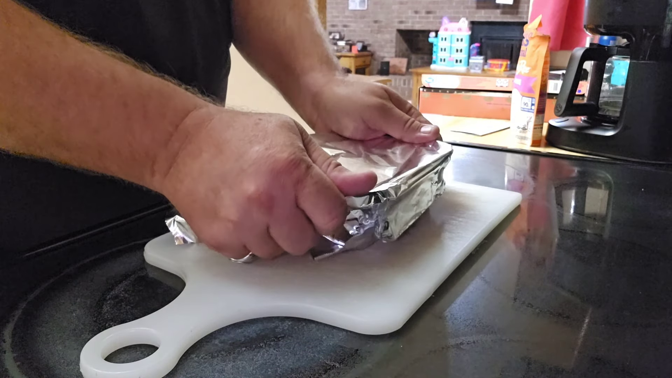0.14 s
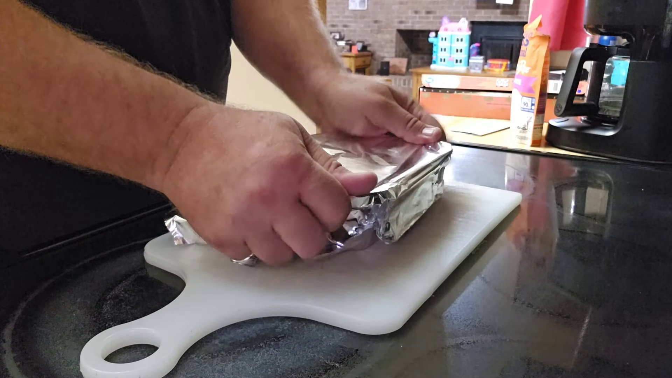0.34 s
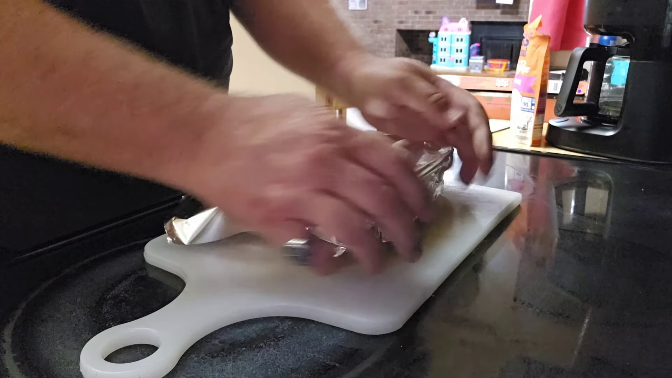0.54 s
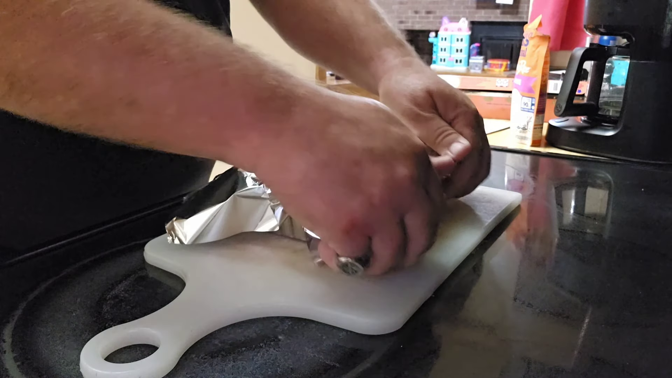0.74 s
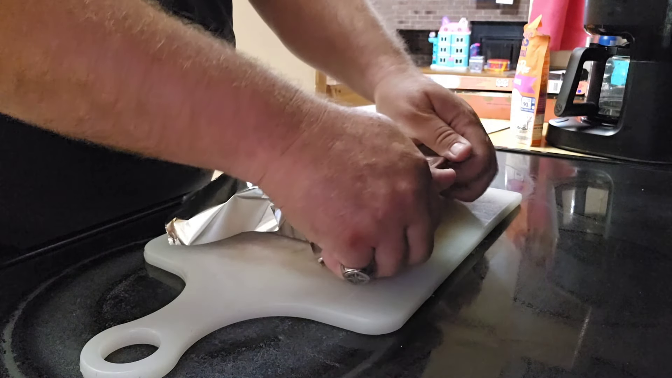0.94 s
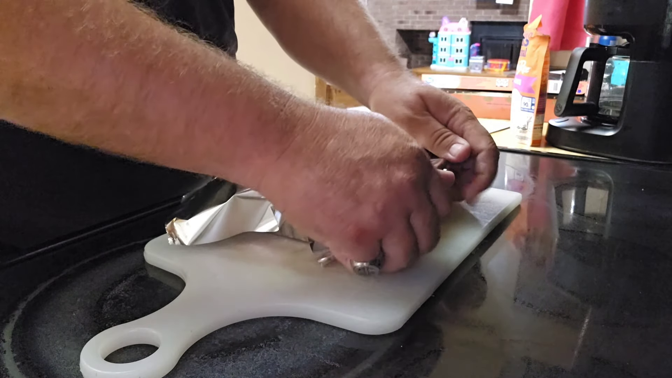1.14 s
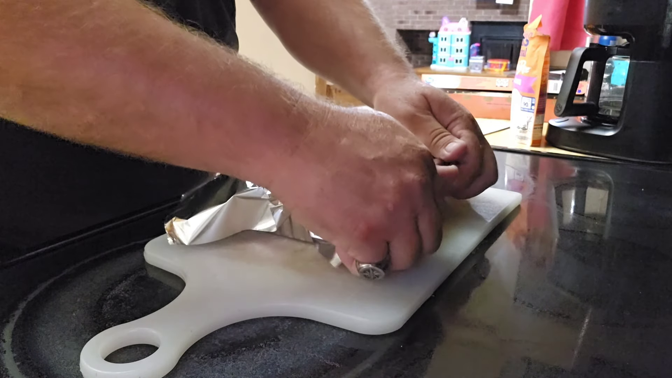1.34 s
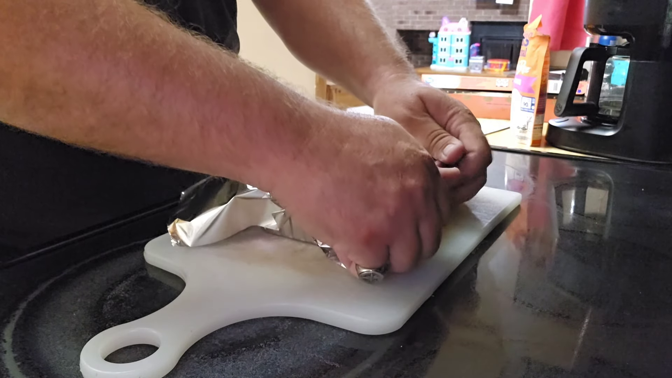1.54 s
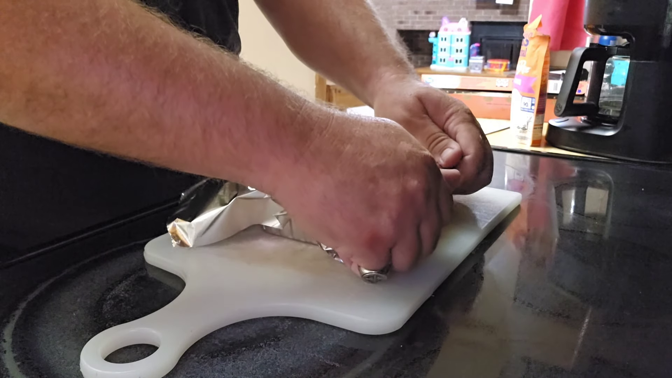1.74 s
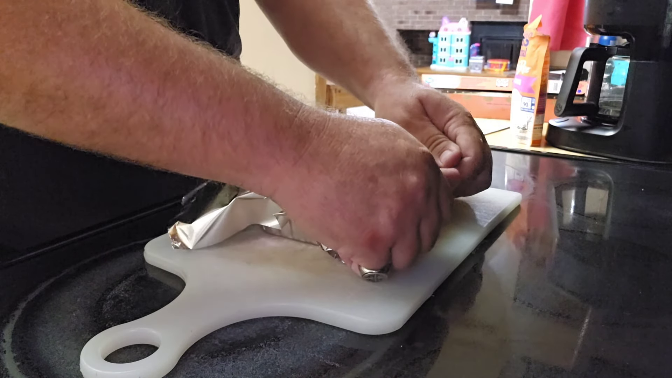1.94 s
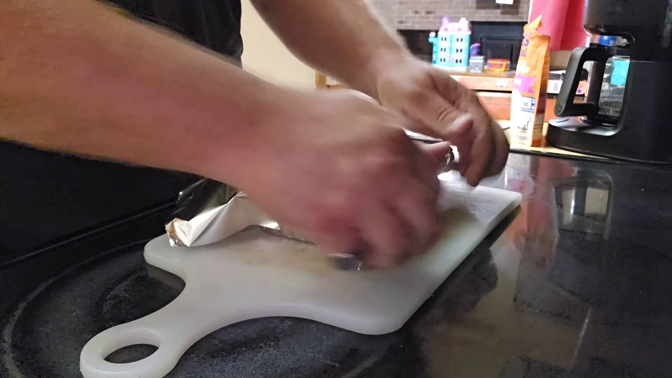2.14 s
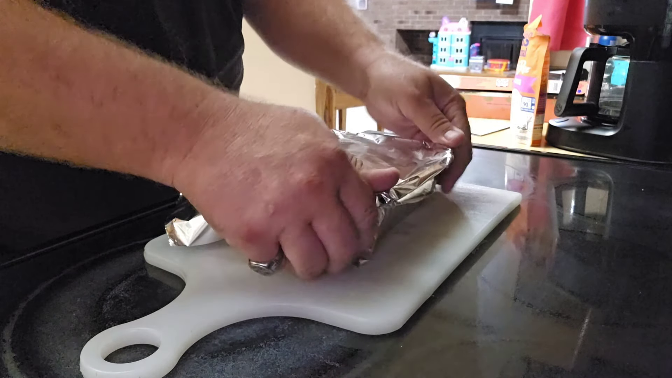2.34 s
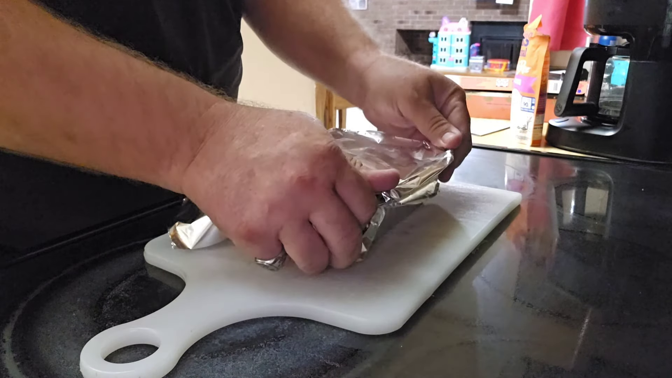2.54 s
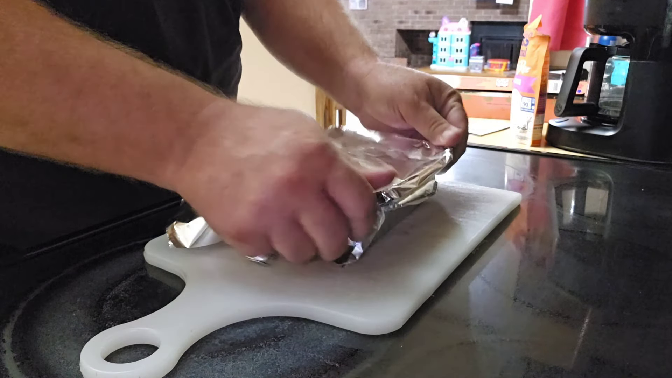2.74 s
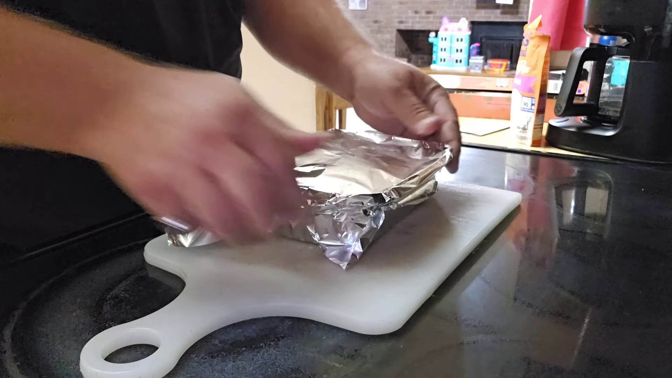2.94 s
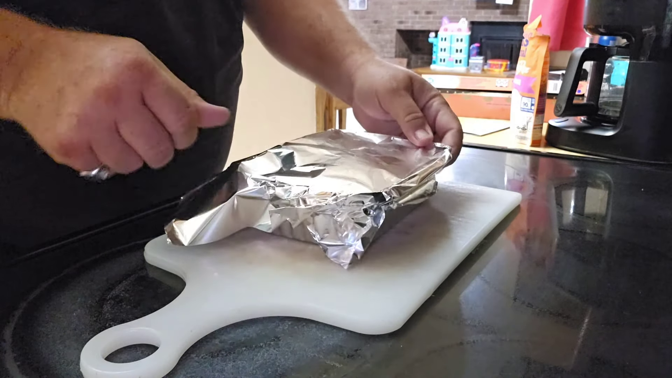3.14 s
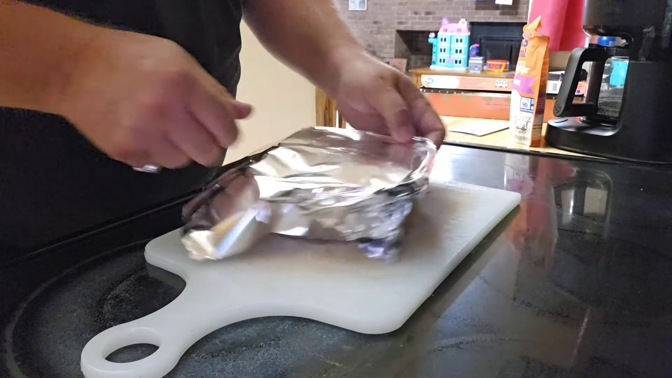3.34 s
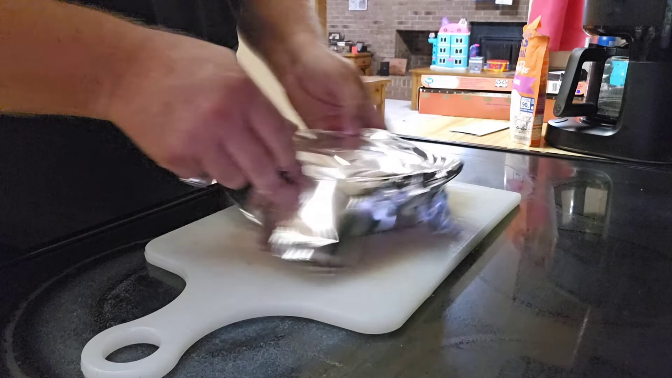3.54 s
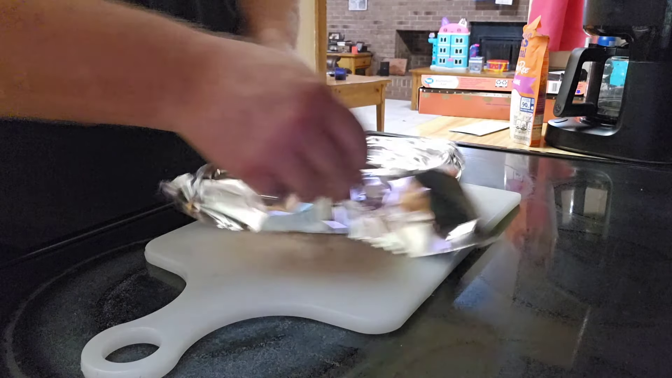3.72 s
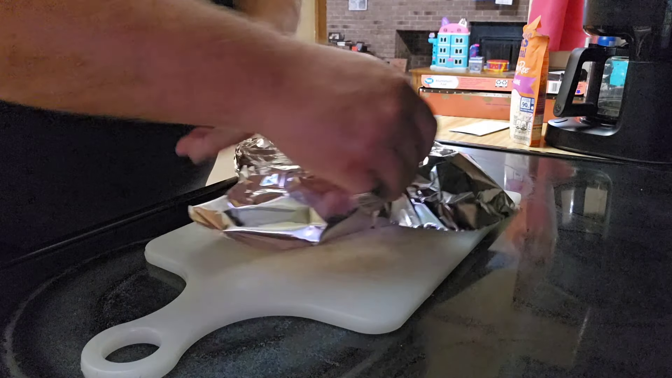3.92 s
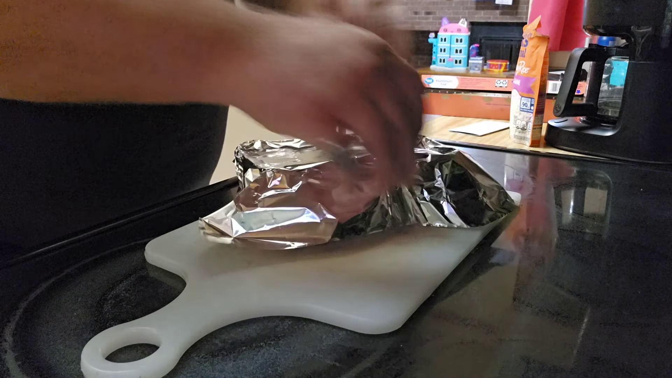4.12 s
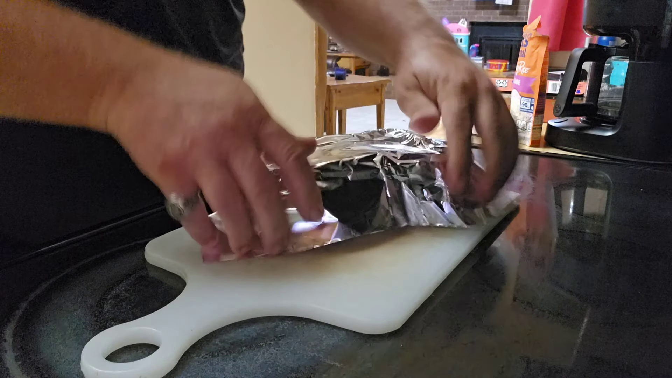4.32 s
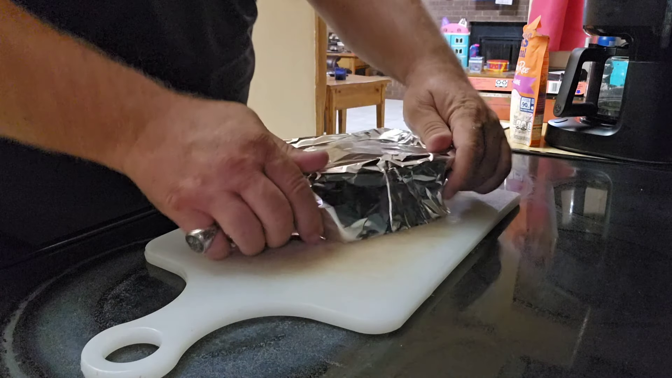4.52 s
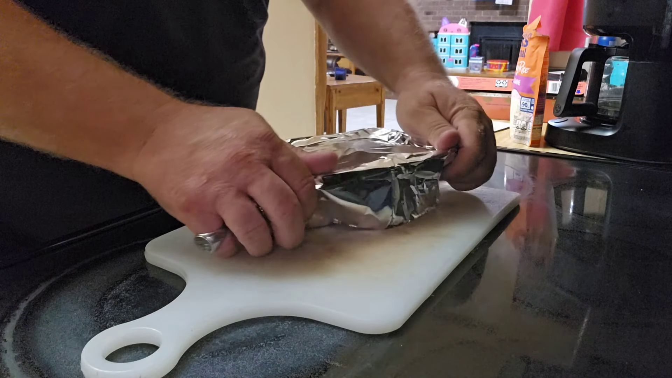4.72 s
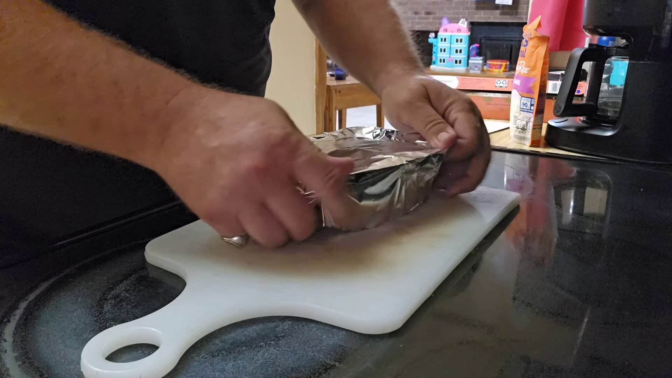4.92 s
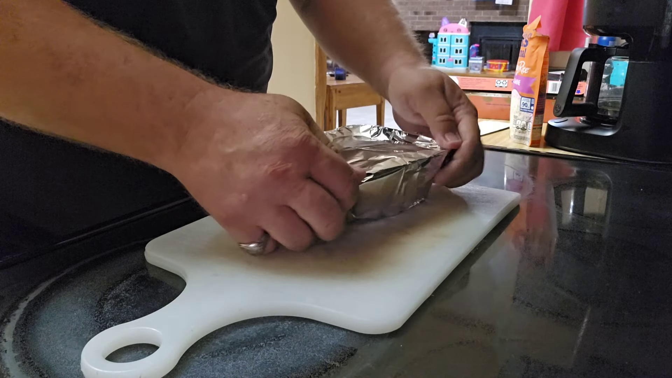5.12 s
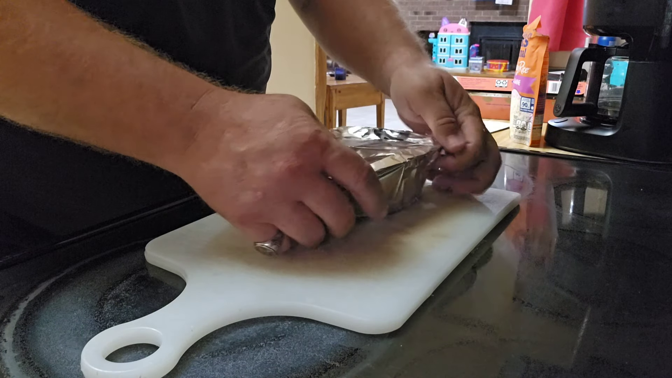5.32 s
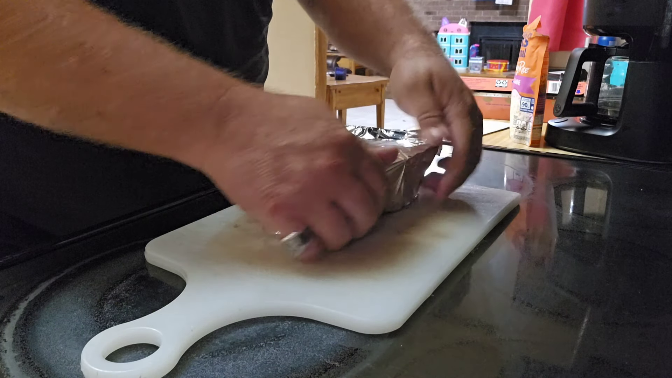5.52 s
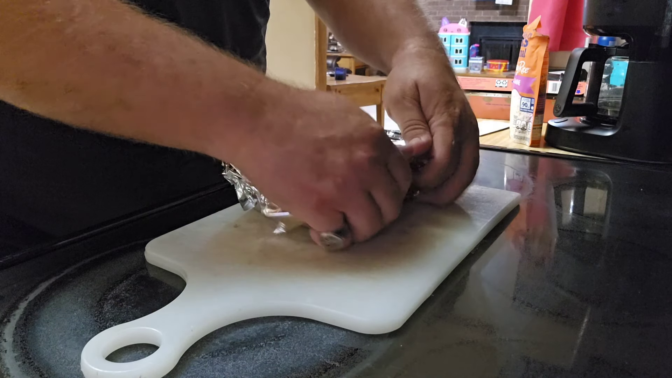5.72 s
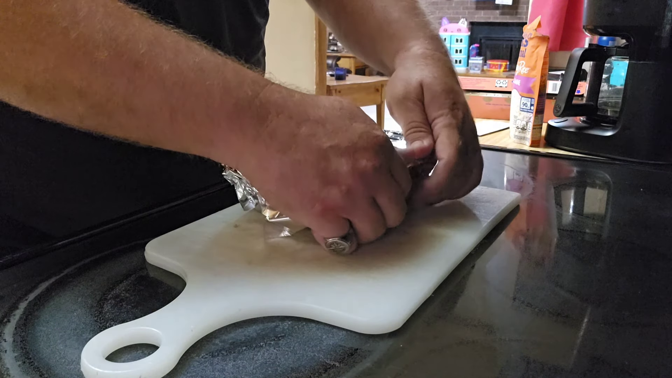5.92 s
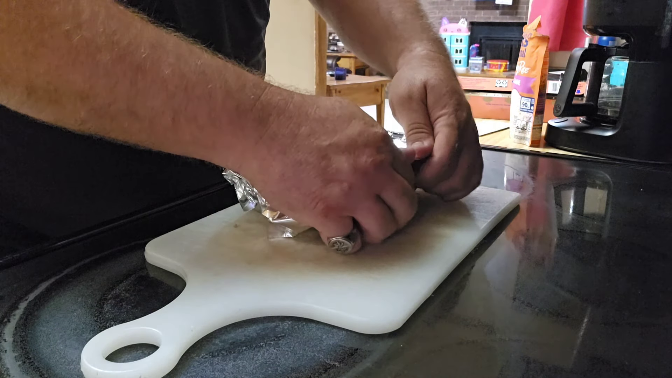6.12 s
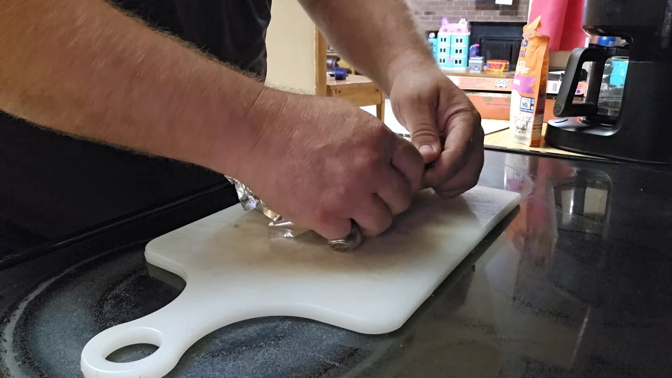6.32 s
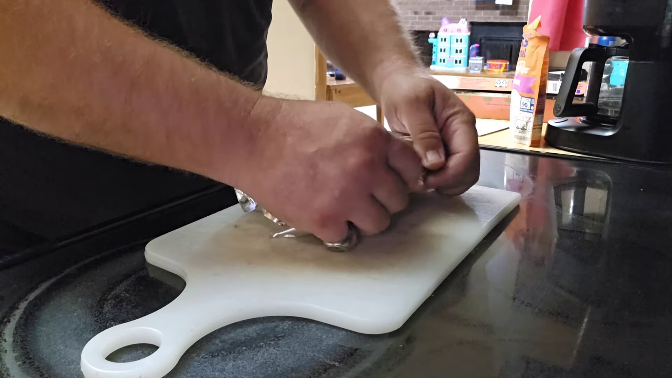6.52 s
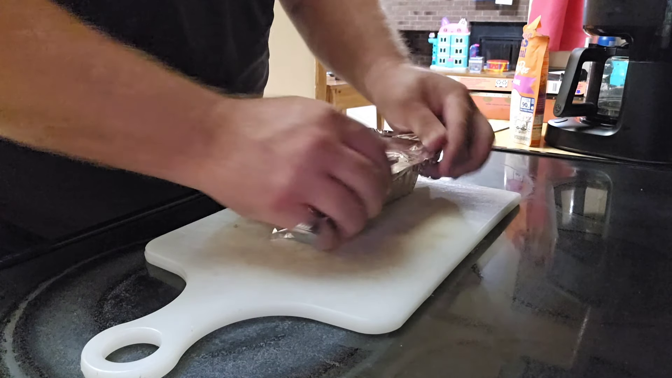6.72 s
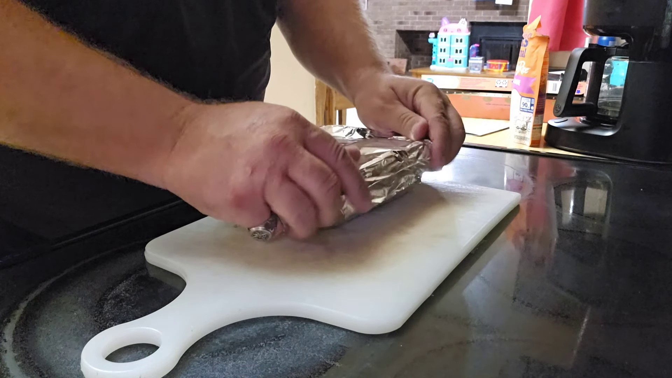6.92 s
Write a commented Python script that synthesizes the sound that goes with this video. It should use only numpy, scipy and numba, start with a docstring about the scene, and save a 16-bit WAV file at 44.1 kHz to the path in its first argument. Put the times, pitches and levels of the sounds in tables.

```python
"""Foil folded round a dish

Two hands fold and press thin metal foil round a dish on a plastic board, close to a phone on a kitchen counter.
Creases buckle as showers of tiny damped rings, and each fold lets go as a short avalanche of them.
Knocks wake the modes of the dish and board underneath; bumps add dull, fast-fading low tones.
An appliance hums over shaped-noise rumble; foil, dish and bumps sound in a small hard room."""
import sys
import numpy as np
from scipy import signal
from scipy.fft import rfft, irfft, next_fast_len
from scipy.io import wavfile
from scipy.ndimage import uniform_filter1d
from numba import njit

SR = 44100
rng = np.random.default_rng(int(sys.argv[2]) if len(sys.argv) > 2 else 0)


def int16_out(signal):
    """Quantize to a 16-bit WAV file."""
    q = np.round(np.clip(np.atleast_2d(signal).T, -1, 1) * 32767)
    wavfile.write(sys.argv[1], SR, q.astype(np.int16))


def attenuation_scalar(level_db):
    """Turn a level in dB into a linear amplitude multiplier (20 dB per decade)."""
    decades = np.asarray(level_db, float) / 20
    return 10 ** decades


N = 307377  # length in samples

# kitchen rumble, joined on a log-frequency axis: f/Hz, relative level/dB
RUMBLE_COLOUR = [(15, -53), (25, -3.5), (70, -5.5), (123, -7), (200, -6), (285, -15), (317, -28.5),
                 (463, -18), (516, -27.5), (962, -30), (1290, -34), (2690, -35), (5280, -56), (16000, -91)]
# motor tones, before they waver: f/Hz, rms level/dB
HUM_TONES = [(59.5, -63), (182, -65), (213, -68)]
# steady hand work, before lulls and foil colour: t/s, crackle level/dB, dish ring above crackle/dB
HAND_EFFORT = [(0, -31, -9.5), (0.25, -37.5, -9), (0.45, -40, -11), (0.8, -40, -10.5), (1.15, -43.5, -6.5),
               (1.4, -41.5, -8), (1.8, -34.5, -17.5), (2.08, -43.5, -2.5), (2.4, -45.5, -7),
               (2.55, -36, -10), (2.8, -38.5, -10.5), (3.05, -54, -14), (3.4, -39, -14),
               (3.56, -44.5, -11.5), (3.651, -28, -2), (3.8, -25, -6), (4.1, -40.5, -4), (4.6, -31.5, -4.5),
               (5.25, -41.5, -6.5), (5.7, -35.5, -12.5), (6.5, -37, -8), (6.97, -33, -10)]
# hands ease off or let go to take a new grip: start t/s, length/s, crackle drop/dB (negative lifts it)
GRIP_LULLS = [(0.24, 0.067, 3), (0.527, 0.17, 23), (0.805, 0.048, -3), (1.076, 0.034, 9),
              (1.197, 0.069, 14), (1.43, 0.031, 5.5), (1.929, 0.068, 8.5), (2.116, 0.19, 29),
              (2.665, 0.066, 13), (2.811, 0.17, 21.5), (3.05, 0.081, 6), (3.227, 0.053, 9),
              (4.145, 0.19, 34), (4.906, 0.06, 0.5), (5.345, 0.08, 6.5), (5.491, 0.1, 10.5),
              (5.785, 0.097, 11.5), (6.273, 0.05, 8), (6.638, 0.16, 10)]
# tone of the foil sheet, joined on a log-frequency axis: f/Hz, gain/dB
FOIL_COLOUR = [(1400, -17), (2400, -1.5), (3500, -1), (4200, 3), (7350, 2), (8350, -0.5), (9560, 0.5),
               (10400, -4), (15100, -0.5), (16200, -19)]
# modes of the wrapped dish on its board: f/Hz, bandwidth/Hz, relative level/dB
DISH_MODES = [(245, 15.4, -21), (454, 103, -21), (763, 66, -9.5), (1145, 126, -3), (1284, 64, -6.5),
              (1401, 60, -2), (1648, 39, -7), (2065, 63.5, 2), (2231, 42, -3.5), (2720, 270, -0.5)]
# clearest folds that let go, before foil colour: t/s, length/s, level/dB, dish ring above fold/dB
CLEAR_FOLDS = [(0.024, 0.023, -29.5, -16), (0.058, 0.023, -34.5, -7.5), (0.201, 0.01, -22.5, -14),
               (0.225, 0.012, -33, -31), (0.303, 0.012, -31, -19.5), (0.3524, 0.021, -31, -5.5),
               (0.38, 0.041, -28, -11), (0.434, 0.011, -29.5, -28), (0.5052, 0.019, -27.5, -16),
               (0.711, 0.0085, -35.5, -17), (0.7184, 0.0099, -27.5, -15), (0.7662, 0.027, -30, -13),
               (0.856, 0.019, -29, -18.5), (0.947, 0.0074, -32.5, -11.5), (1.1287, 0.0052, -26.5, -19.5),
               (1.1522, 0.047, -32.5, -6.5), (1.268, 0.015, -48, -7), (1.317, 0.01, -29.5, -12),
               (1.361, 0.016, -34, -13), (1.404, 0.011, -36.5, -24), (1.473, 0.009, -29.5, -9.5),
               (1.499, 0.016, -34.5, -5), (1.5407, 0.012, -28.5, -1), (1.6566, 0.018, -29, -8.5),
               (1.736, 0.018, -31.5, -7.5), (1.76, 0.013, -35, -13), (1.887, 0.017, -26.5, -10),
               (2.026, 0.034, -27.5, -11), (2.13, 0.011, -42.5, -2), (2.2982, 0.014, -32, -14),
               (2.3384, 0.028, -43, -9), (2.417, 0.013, -34, -20), (2.4355, 0.0074, -28.5, -31),
               (2.483, 0.014, -33, -24), (2.51, 0.013, -28, -28), (2.546, 0.019, -31, -18),
               (2.643, 0.01, -26, -28.5), (2.7776, 0.017, -29.5, -18), (2.995, 0.012, -40, -16),
               (3.01, 0.019, -39.5, -15), (3.1185, 0.0073, -33.5, -21), (3.15, 0.0038, -31.5, -34),
               (3.177, 0.028, -43, -16), (3.211, 0.016, -34, -20), (3.291, 0.026, -38, -8.5),
               (3.321, 0.012, -40.5, 0), (3.439, 0.05, -37.5, -7.5), (3.501, 0.031, -32.5, -17),
               (3.605, 0.061, -31, -14.5), (4.0796, 0.034, -28.5, -8.5), (4.324, 0.012, -38.5, -23),
               (4.3464, 0.032, -19.5, -12.5), (4.428, 0.047, -31.5, -24), (4.474, 0.02, -27.5, -10),
               (4.4955, 0.053, -26, -7), (4.647, 0.023, -25.5, -2.5), (4.703, 0.027, -29, -1),
               (4.736, 0.014, -25, -1), (4.758, 0.06, -29, -13.5), (4.893, 0.0076, -32.5, -24),
               (4.967, 0.027, -33, -3.5), (5.014, 0.034, -26, -10.5), (5.102, 0.032, -27.5, -5),
               (5.223, 0.051, -34, -16), (5.3133, 0.0087, -27, -11.5), (5.4, 0.015, -32.5, -7.5),
               (5.4714, 0.028, -36, -2), (5.571, 0.0095, -34, -24), (5.589, 0.041, -34.5, -3.5),
               (5.725, 0.013, -31, -9), (5.764, 0.015, -34, -6), (5.823, 0.014, -34.5, -7),
               (5.886, 0.008, -37, -9), (5.894, 0.016, -23, -10.5), (6.2043, 0.0095, -25.5, -9.5),
               (6.2524, 0.0089, -33, -28), (6.3244, 0.014, -33, -1), (6.395, 0.016, -27.5, -4.5),
               (6.5475, 0.01, -30.5, -13), (6.575, 0.035, -33, -6.5), (6.624, 0.017, -39, -5),
               (6.7164, 0.03, -35, -11.5), (6.789, 0.013, -27.5, -21.5), (6.8034, 0.04, -28, -14.5),
               (6.861, 0.013, -26.5, -7), (6.89, 0.025, -28, -15.5), (6.944, 0.02, -31, -15)]
# dish and knuckles bump the board: t/s, relative level/dB, f/Hz
BOARD_BUMPS = [(0.387, -46.5, 487), (0.509, -47, 410), (1.888, -61, 730), (3.738, -56, 624),
               (4.511, -39, 715), (4.65, -49.5, 245), (4.791, -39, 681), (5.106, -56, 245),
               (5.609, -41.5, 252)]

RUMBLE_DB = -60  # rms of the part shared by both ports, before balance
EASE_SHARE, REGRIP_SHARE = 0.33, 0.12  # parts of a lull spent fading out and coming back
CREASES_PER_S = 8000
KNOCK_EVERY = 8  # one ring in this many also knocks the dish
RINGS_PER_FOLD = 160
FOLD_TILT_DB = 4.5  # treble lift per octave above 6 kHz
SMALL_FOLDS_PER_S = 14
SMALL_FOLD_S, SMALL_FOLD_DB, SMALL_DISH_DB = .007, 3, -10  # typical length, level over crackle, ring over fold
TOP_HZ = 15900


def colour(x, points):
    """Shape a spectrum by (Hz, dB) points joined on a log-frequency axis."""
    hz, db = np.transpose(points)
    n = next_fast_len(N)
    f = np.maximum(np.arange(n // 2 + 1) * SR / n, 1)
    gain = attenuation_scalar(np.interp(np.log(f), np.log(hz), db))
    return irfft(rfft(x, n) * gain, n)[..., :N]


def walk(rate):
    """Random levels held 1 / rate s and slewed twice; spread near 1."""
    hold = int(SR / rate)
    steps = np.repeat(rng.standard_normal(N // hold + 1), hold)
    return 1.37 * uniform_filter1d(uniform_filter1d(steps, hold), hold)[:N]


def kitchen():
    """Steady rumble and wavering motor tones; bass nearly alike at both ports."""
    mid, side = colour(rng.standard_normal((2, N)), RUMBLE_COLOUR)
    side = colour(side, [(100, -18.5), (600, 0), (2500, -17.0)])
    rumble = (mid + side * np.array([[1], [-1]])) * attenuation_scalar(RUMBLE_DB) / np.std(mid)
    t = np.arange(N) / SR
    hum = np.zeros(N)
    for hz, db in HUM_TONES:
        level = np.sqrt(2) * attenuation_scalar(db + 1.4 * walk(13))
        hum += level * np.sin(2 * np.pi * hz * t + 1.31 * walk(7))
    return (rumble + hum) * attenuation_scalar(np.array([[.6], [-.6]]))


@njit
def rings(start, hz, decay, size, n):
    """Damped rings that begin between samples and fall to 1/e in decay seconds."""
    out = np.zeros(n)
    for g in range(len(hz)):
        rate = (2j * np.pi * hz[g] - 1 / decay[g]) / SR
        first = int(np.ceil(start[g]))
        z = size[g] * np.exp(rate * (first - start[g]))
        turn = np.exp(rate)
        for i in range(max(first, 0), min(n, first + int(5 * decay[g] * SR))):
            out[i] += z.imag
            z *= turn
    return out


def shower(s, hz, decay_ms, db, per_s, tail_db, lag=6.0, lag_spread=2.14, pan_db=3.5, pan_spread_db=3):
    """Rings scaled to rms db before panning; each has its own delay (samples) and balance at the two ports."""
    s, hz, decay_ms, db, per_s = (v.ravel() for v in np.broadcast_arrays(s, hz, decay_ms, db, per_s))
    decay = np.clip(decay_ms, .05, 20) / 1000
    hz = np.clip(hz, 100, .4 * SR)
    delay_draw, pan_draw, sign_draw = rng.standard_normal((len(s), 3)).T
    # a few rings stand well above the rest
    size = attenuation_scalar(tail_db * rng.exponential(size=len(s))) * np.sign(sign_draw)
    # a ring holds size^2 decay / 4 of energy
    size = size * attenuation_scalar(db) / np.sqrt(np.mean(size ** 2 * decay) * per_s / 4)
    late = lag + lag_spread * delay_draw
    pan = attenuation_scalar((pan_db + pan_spread_db * pan_draw) / 2)
    left = rings(s * SR, hz, decay, size * pan, N)
    right = rings(s * SR + late, hz, decay, size / pan, N)
    return np.array([left, right])


def effort(t):
    """Crackle level and dish ring (dB) at times t; a lull fades the crackle, then brings it back quickly."""
    s, db, dish_db = np.transpose(HAND_EFFORT)
    start, length, drop_db = np.transpose(GRIP_LULLS)[:, :, None]
    x = (t - start) / length
    eased = np.clip(np.minimum(x / EASE_SHARE, (1 - x) / REGRIP_SHARE), 0, 1)
    crackle_db = np.interp(t, s, db) - np.sum(drop_db * eased, axis=0)
    return crackle_db, np.interp(t, s, dish_db)


def crackle():
    """Small creases give way at random, swelling in quick bunches; a lighter touch sounds duller."""
    count = int(CREASES_PER_S * N / SR)
    when, pitch = rng.random((count, 2)).T
    t, at = when * N / SR, (when * N).astype(int)
    effort_db, dish_db = effort(t)
    db = effort_db + (2.1 * walk(35) + 0.29 * walk(120))[at]
    hz = 2400 + 14000 * pitch
    # treble tilt per octave above 6 kHz, up to one octave
    top_db = (0.14 * (db + 20.5) - 4.5) * np.clip(np.log2(hz / 6000), 0, 1)
    decay_ms = 0.39 + 0.11 * rng.exponential(size=count)
    sheet = shower(t, hz, decay_ms, db + top_db - .3, CREASES_PER_S, 0.5)
    few = slice(None, None, KNOCK_EVERY)
    grip = 0.011 * walk(6)[at]
    favour_db = 1.4 * np.transpose([walk(11)[at[few]] for _ in DISH_MODES])
    ring = dish(t[few], (db + dish_db)[few], CREASES_PER_S / KNOCK_EVERY, grip[few], favour_db)
    return sheet, ring


def dish(s, db, per_s, grip, favour_db):
    """Each knock wakes one mode; the grip of the hands shifts all modes together, the spot favours some."""
    mode = rng.integers(len(DISH_MODES), size=s.shape)
    hz, width, mode_db = np.transpose(DISH_MODES)[:, mode]
    mode_db = mode_db + np.take_along_axis(favour_db, mode[..., None], axis=-1)[..., 0]
    hz = hz * (1 + grip + 0.02 * rng.standard_normal(s.shape))
    decay_ms = 1000 / (np.pi * width)  # a narrow mode rings longer
    return shower(s, hz, decay_ms, db + mode_db + 3, per_s, 1.4, lag=5.1, lag_spread=3.24, pan_db=1.0)


def small_folds():
    """Lesser folds fall at random within even slots and follow the effort of the hands; rows as in CLEAR_FOLDS."""
    count = int(SMALL_FOLDS_PER_S * N / SR)
    s = (np.arange(count) + rng.random(count)) / SMALL_FOLDS_PER_S
    length_draw, level_draw, dish_draw = rng.standard_normal((count, 3)).T
    length = SMALL_FOLD_S * np.exp(0.36 * length_draw)
    db = effort(s)[0] + SMALL_FOLD_DB + 1.42 * level_draw
    return np.transpose([s, length, db, SMALL_DISH_DB + 4 * dish_draw])


def folds():
    """An avalanche builds fast, runs for its length and trails off; some rings bunch round that facet's pitch."""
    rows = np.vstack([CLEAR_FOLDS, small_folds()])
    s, length, db, dish_db = rows.T[:, :, None]
    length = np.maximum(length, .003)
    shape = (len(rows), RINGS_PER_FOLD)
    when, kind, pitch = np.moveaxis(rng.random(shape + (3,)), -1, 0)
    detune = rng.standard_normal(shape)
    trail, linger = np.moveaxis(rng.exponential(size=shape + (2,)), -1, 0)
    at = s + length * (.6 * when + .25 * trail)
    # somewhere early in the fold one long crease cracks all at once
    crack = s + .45 * length * when[:, :1] + 0.00052 * trail
    at = np.where(kind > .91, crack, at)
    on_facet = kind < .25
    facet_hz = 3200 * 2.6 ** pitch[:, :1] * np.exp(0.102 * detune)
    hz = np.where(on_facet, facet_hz, 2400 + 14000 * pitch)
    top_db = FOLD_TILT_DB * np.clip(np.log2(hz / 6000), 0, 1)
    decay_ms = 0.66 + (0.18 + 0.62 * on_facet) * linger
    per_s = RINGS_PER_FOLD / length
    sheet = shower(at, hz, decay_ms, db + top_db - 3.5, per_s, 1.0)
    favour_db = 2.44 * rng.standard_normal((len(rows), 1, len(DISH_MODES)))
    grip = 0.073 * detune[:, :1]
    knock = dish(at[:, ::KNOCK_EVERY], db + dish_db - 2.5, per_s / KNOCK_EVERY, grip, favour_db)
    return sheet, knock


def bumps():
    """Dull low blows on the board: sines that die away within a few cycles."""
    s, db, hz = np.transpose(BOARD_BUMPS)[:, :, None]
    t = np.maximum(np.arange(N) / SR - s, 0)
    blows = attenuation_scalar(db + 2.0) * np.sin(2 * np.pi * hz * t) * np.exp(-t * hz / 3.6)
    return np.sum(blows, axis=0)


def room(x, near_s=0.079, near_db=-7, t60_s=0.19, far_db=-19, damp_hz=6000, notch_hz=310):
    """Quick scatter off counter, hands and dish, then a duller tail from the walls; unrelated left and right."""
    t = np.arange(SR // 3) / SR
    near_noise, far_noise = rng.standard_normal((2, 2, len(t)))
    near = near_noise * attenuation_scalar(-60 * t / near_s)
    dull = signal.lfilter(*signal.butter(1, damp_hz, fs=SR), far_noise)
    far = dull * attenuation_scalar(-60 * t / t60_s) * (t > .004)
    tail = sum(attenuation_scalar(db) * h / np.sqrt(np.sum(h ** 2) / 2) for h, db in ((near, near_db), (far, far_db)))
    wet = x + signal.fftconvolve(x, tail, axes=1)[:, :N]
    # a room reflection cancels a narrow low band, 70 Hz wide, at the phone
    return signal.lfilter(*signal.iirnotch(notch_hz, notch_hz / 70, SR), wet)


def scene():
    """Foil, dish and bumps share the room over the kitchen's own sound."""
    sheet, ring = crackle()
    fold, knock = folds()
    foil = colour(sheet + fold, FOIL_COLOUR)
    return room(foil + ring + knock + bumps()) + kitchen()


def band_limit(x):
    """A steep low-pass at the top of the band."""
    return signal.sosfilt(signal.butter(12, 17000, fs=SR, output="sos"), x)


def record(dry):
    """The phone cuts the top with a steep low-pass."""
    low_pass = signal.ellip(8, .2, 60, TOP_HZ, fs=SR, output="sos")
    mix = signal.sosfilt(low_pass, dry)
    return band_limit(mix)


dry = scene()
out = record(dry)
int16_out(out)
```